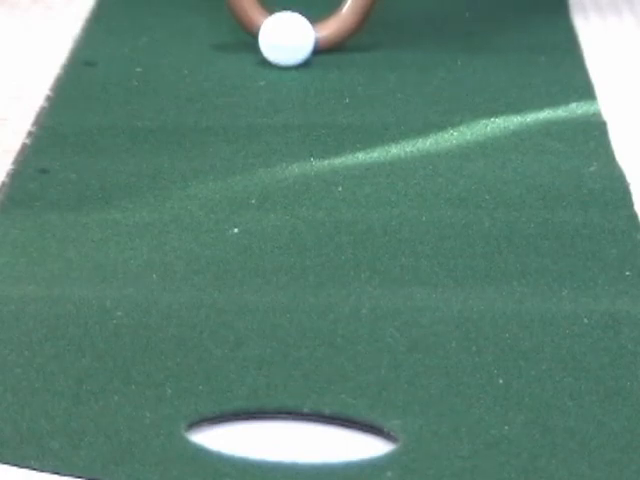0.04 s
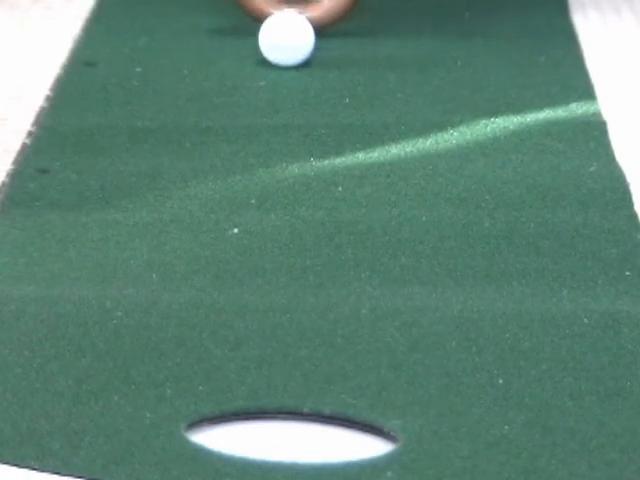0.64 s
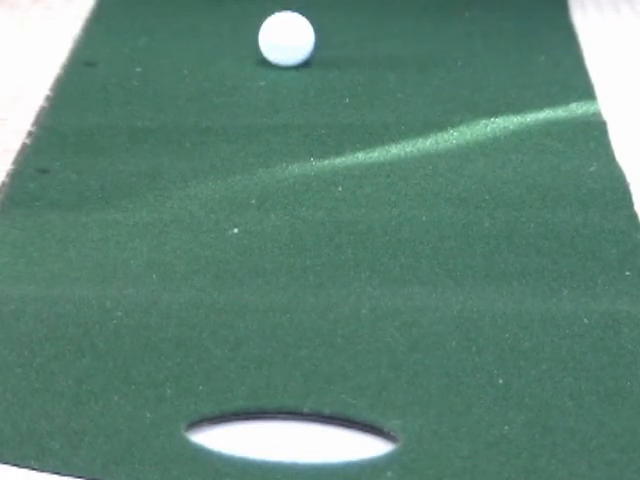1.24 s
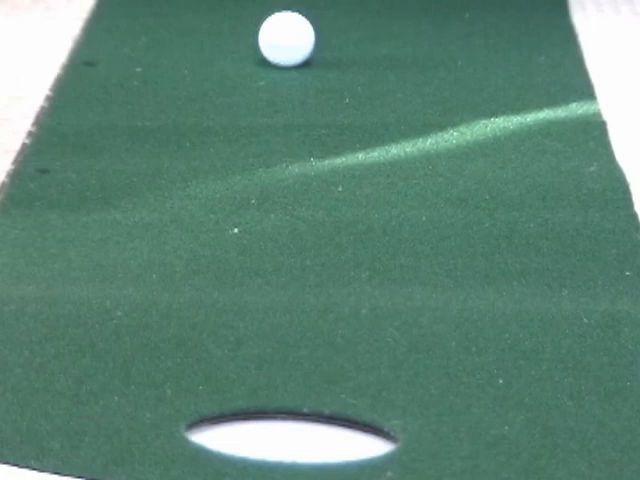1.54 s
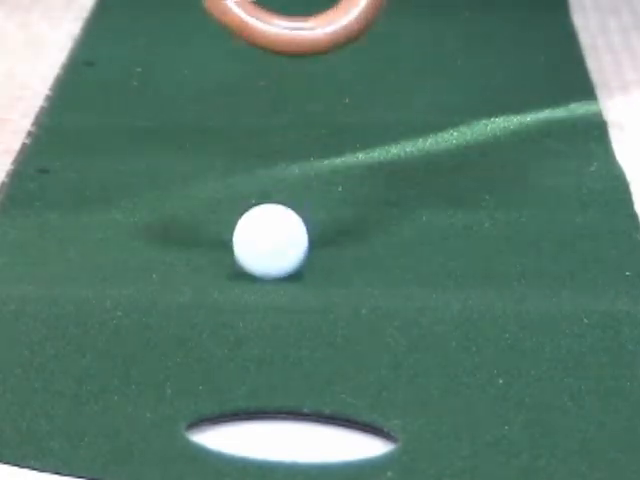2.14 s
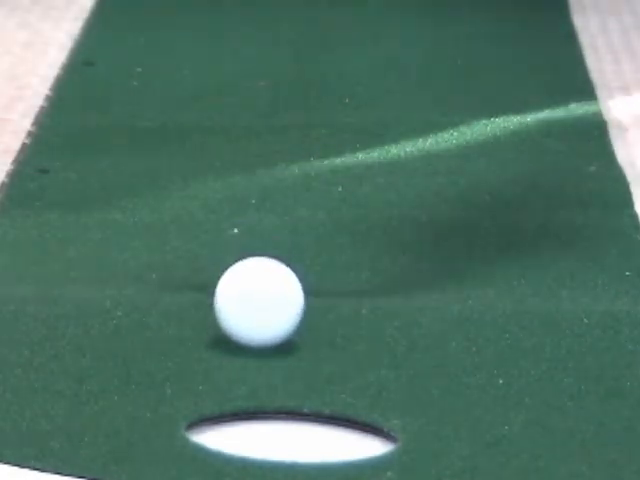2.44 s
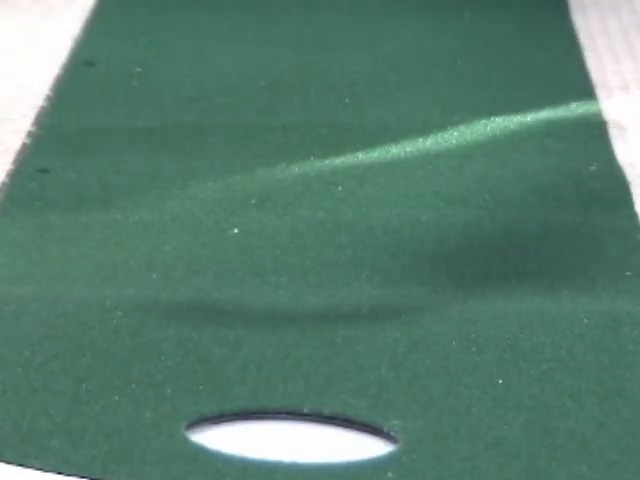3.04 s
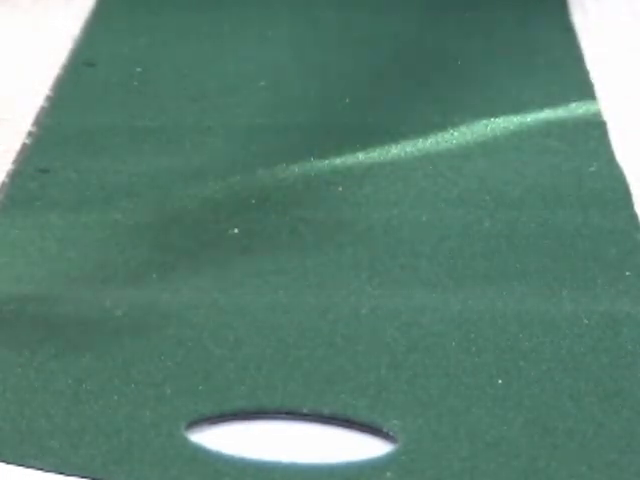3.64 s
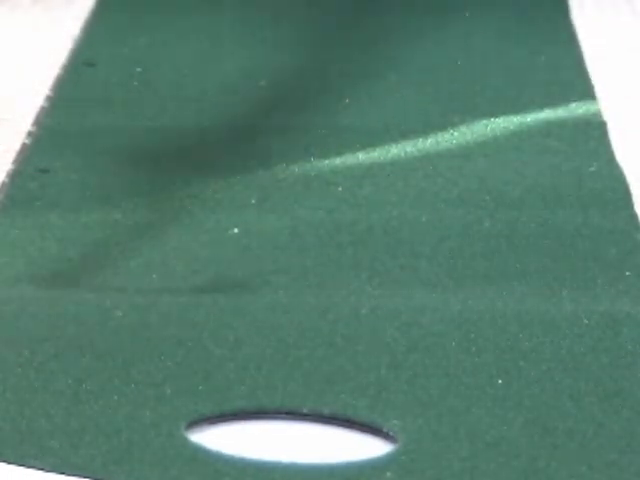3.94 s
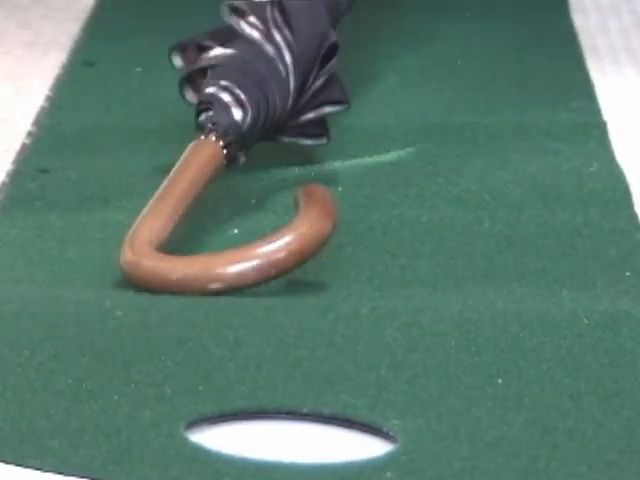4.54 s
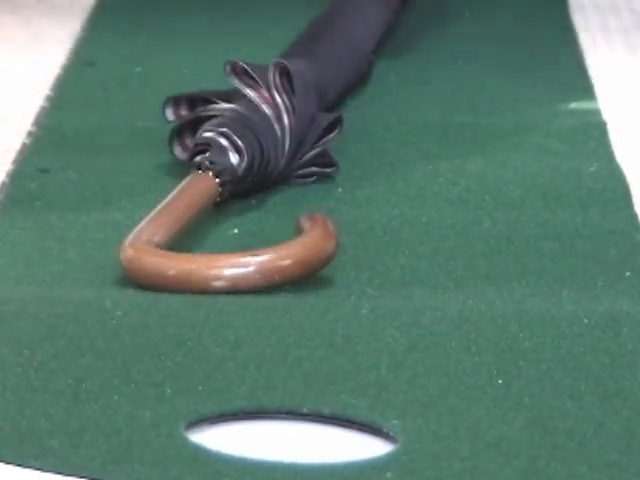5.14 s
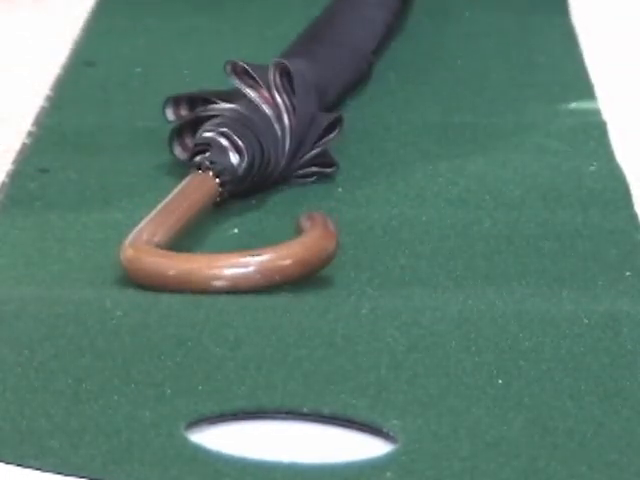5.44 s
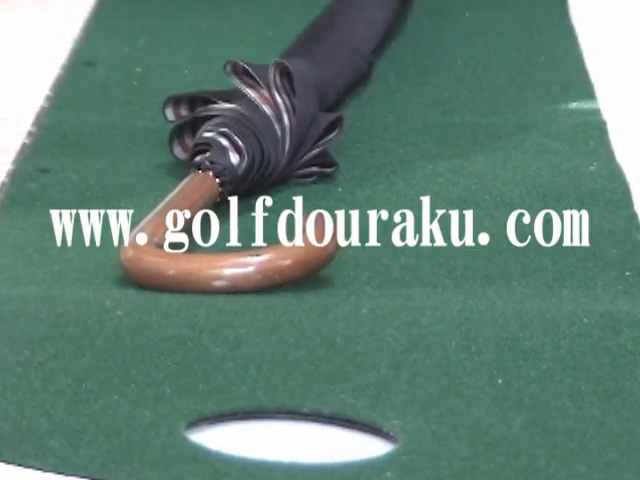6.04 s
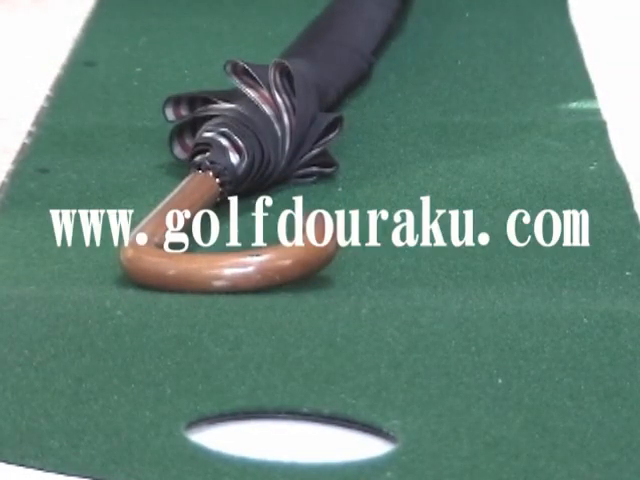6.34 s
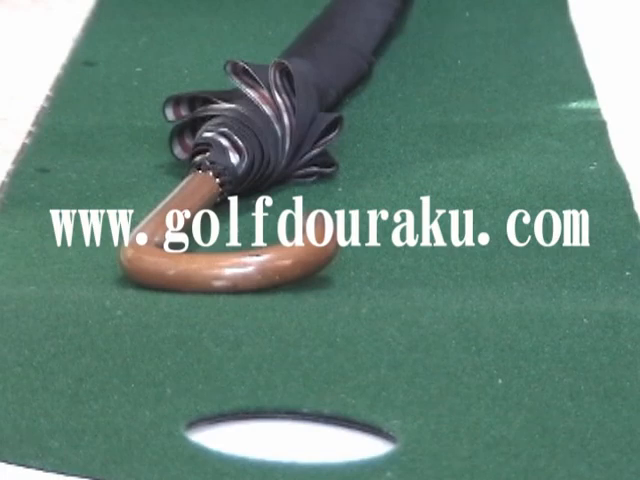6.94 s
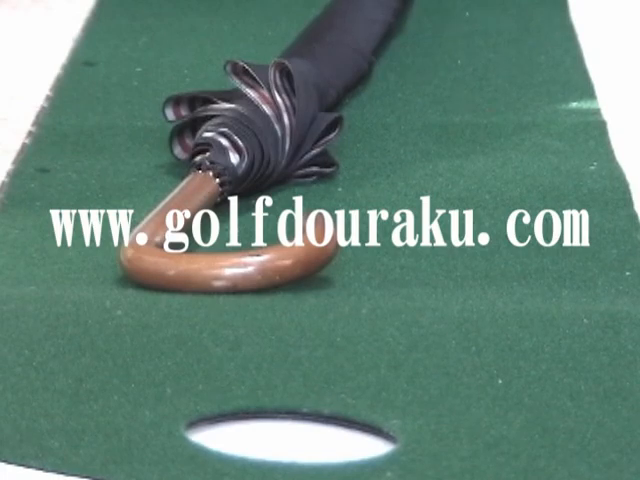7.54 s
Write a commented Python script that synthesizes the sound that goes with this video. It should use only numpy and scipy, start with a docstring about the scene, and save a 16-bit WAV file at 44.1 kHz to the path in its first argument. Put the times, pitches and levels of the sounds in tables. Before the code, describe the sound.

Indoors, a wooden click sends a golf ball into a cup with a loud hollow knock and rattle, followed by soft rustling and thumps.

```python
"""Indoor putt with an umbrella

In a small, hard room the wooden handle of an umbrella clicks against a golf ball. The ball hops and
rolls along a mat, drops into the cup with a hollow knock and clacks about below. Clothes rustle and the
umbrella is laid down. A tape camcorder stands by the cup: its motor whines, and its comb filter (a row
of evenly spaced notches) cuts the hum of its spinning head drum."""
import sys
import numpy as np
from scipy import signal
from scipy.fft import rfft, irfft, next_fast_len
from scipy.io import wavfile

SR = 44100
rng = np.random.default_rng(int(sys.argv[2]) if len(sys.argv) > 2 else 0)


def transcribe(u):
    """Save the signal u as a 16-bit wav file named by the first command-line argument.

    u: samples, shape (n,) or (channels, n), limited to [-1, 1]; the rate is SR.
    q: integer samples, one column per channel.
    """
    v = np.clip(np.atleast_2d(u).T, -1, 1)
    q = np.round(v * 32767).astype(np.int16)
    wavfile.write(sys.argv[1], SR, q)


N = 343098
TIME = np.arange(N) / SR
HIT_SIZE = 32768   # samples for one hit and its echo
PUTT_S, PUTT_DB = 1.776, 21.5   # the handle meets the ball
DROP_S, DROP_DB = 2.7303, 33.1   # the ball meets the bottom of the cup


def from_db(db):
    """Turn decibels into a gain to multiply by."""
    return 10 ** (np.asarray(db) / 20)


def rms_one(x):
    """Scale a sound to an average (rms) level of 1."""
    return x / np.sqrt(np.mean(x ** 2) + 1e-20)


def at_hz(points, hz):
    """Read between the (frequency, value) rows of a table, on an axis of octaves."""
    frequencies, values = np.transpose(points)
    return np.interp(np.log(np.maximum(hz, 1)), np.log(frequencies), values)


def bins(size):
    """The frequencies in the spectrum of a sound this many samples long."""
    return np.arange(size // 2 + 1) * SR / size


def peaks(table, hz):
    """The boost in dB from resonances, the pitches at which a thing likes to ring."""
    return sum(db * np.exp(-2 * ((hz - centre) / width) ** 2) for centre, width, db in table)


def add(out, s, sound):
    """Mix a sound in at time s."""
    start = int(round(s * SR))
    out[:, start:start + sound.shape[-1]] += sound[..., :N - start]


def drift(rate):
    """A random wander of about 1 either way, turning `rate` times a second."""
    knots = rng.standard_normal(4096)
    return np.interp(TIME * rate, np.arange(len(knots)), knots)


def swell(s, rise, t60):
    """A soft rise up to time s, then a fade; t60 is the time it takes to fade by 60 dB."""
    db = np.where(TIME < s, -20 * ((s - TIME) / rise) ** 2, -60 * (TIME - s) / t60)
    return from_db(np.maximum(db, -200))


def bell_curve(s, half_length):
    """A movement that grows and ebbs evenly around time s."""
    return np.exp(-np.minimum(((TIME - s) / half_length) ** 2, 40))


def stereo_spectrum(size, side_db=0.0):
    """The spectrum of white noise as two close microphones hear it: nearly alike."""
    # how much left and right differ: (frequency [Hz], level of the difference [dB])
    width = [(100, -21), (400, -20), (1200, -13.5), (2500, -16), (7000, -15.5), (13000, -17)]
    mid, side = rfft(rng.standard_normal((2, size)))
    return mid + from_db(side_db + at_hz(width, bins(size))) * side * [[1], [-1]]


def noise(colour, side_db=0.0):
    """Stereo noise at level 1 with a given colour, its balance of low and high pitches."""
    size = next_fast_len(N)
    spectrum = stereo_spectrum(size, side_db) * from_db(at_hz(colour, bins(size)))
    return rms_one(irfft(spectrum, size)[:, :N])


def room(direct_db, bright_hz, build_s=0.00097):
    """The room answers a click: direct sound, early echoes and a tail that dies band by band."""
    # echoes off near surfaces: (delay [s], level against the direct sound [dB])
    echoes = [(.0031, -7), (.0069, -13.5), (0.0101, -8), (0.0165, -19), (.0315, -12.5)]
    # how long the room rings: (frequency [Hz], t60 [s])
    fade_times = [(100, 0.35), (300, 0.22), (600, 0.21), (1500, .23), (4000, 0.23), (10000, 0.18)]
    t, hz = TIME[:HIT_SIZE], bins(HIT_SIZE)
    early = np.zeros(HIT_SIZE)
    for delay, db in [(0.00026, 0.0047)] + echoes:   # the direct sound comes first
        early[int(delay * SR)] += from_db(db + direct_db)
    # felt and cup wall shade the near paths, so most of the treble arrives through the room
    early = signal.sosfilt(signal.butter(1, bright_hz, fs=SR, output="sos"), early)
    white, tail = stereo_spectrum(HIT_SIZE), 0
    edges = np.r_[0, np.geomspace(140, 14000, 19), SR / 2]
    for low, high in zip(edges, edges[1:]):
        decay = from_db(-60 * t / at_hz(fade_times, (low + high) / 2)) * (1 - np.exp(-t / build_s))
        band = irfft(white * ((hz >= low) & (hz < high))) * decay
        tail = tail + rms_one(band) * np.sqrt(2 * (high - low) / SR / HIT_SIZE)
    return rms_one(early + tail) / np.sqrt(HIT_SIZE)


def contact(colour_db, response):
    """One sharp click of a given colour, sent through the room's response."""
    cepstrum = irfft(np.log(from_db(colour_db)))
    # folding this onto its first half keeps the colour and packs the energy at the click's start
    cepstrum[1:HIT_SIZE // 2] *= 2
    cepstrum[HIT_SIZE // 2 + 1:] = 0
    return -irfft(np.exp(rfft(cepstrum)) * rfft(response))


def ringing(tones):
    """The fading tones of a struck thing; every second one is flipped, so they swell and beat."""
    t = TIME[:HIT_SIZE]
    return sum((-1) ** k * from_db(db - 60 * t / t60) * np.sin(2 * np.pi * hz * t)
               for k, (hz, db, t60) in enumerate(tones))


def camcorder(hiss_db=-56.5, bearing_db=-75.5, throb_hz=39.7, throb_db=4.0):
    """The tape motor hums in narrow bands and a bearing sings in throbs, over a steady hiss."""
    # motor resonances: (frequency [Hz], width [Hz], level [dB])
    resonances = [(123, 14.6, -70), (283.1, 7.6, -68), (329.6, 8, -69), (478.7, 13, -70.5),
                  (658, 26, -73.5), (800, 8.7, -75.5), (867, 8.2, -73), (988, 20, -77), (1334, 22, -75.5),
                  (2090, 580, -70), (8020, 200, -86.5), (8550, 210, -86)]
    # colour of the bearing's song: (frequency [Hz], level [dB])
    bearing_colour = [(4300, -40), (5050, 4.5), (5350, 9), (5480, 2.5), (5750, -25), (6500, -41)]
    # steady noise of room and camcorder: (frequency [Hz], level [dB])
    hiss_colour = [(15, -32), (25, -12.5), (108, -6), (250, -10), (325, -4), (361, -8.5), (494, -8.5),
                   (609, -10.5), (833, -9), (1230, -13.5), (3080, -21), (5340, -25), (6250, -29.5),
                   (10500, -35.5), (13000, -44)]
    size = next_fast_len(N)
    power = sum(from_db(db) ** 2 / width / (1 + (2 * (bins(size) - hz) / width) ** 4)
                for hz, width, db in resonances)
    motor = irfft(stereo_spectrum(size, side_db=8.0) * np.sqrt(power * SR / 2), size)[:, :N]
    throb = throb_db * np.sin(2 * np.pi * throb_hz * TIME)
    bearing = from_db(bearing_db + throb) * noise(bearing_colour)
    return motor + bearing + from_db(hiss_db) * noise(hiss_colour, side_db=9.5)


def head_drum(spin_hz=149.85, wobble_turns=.0015, size=4096):
    """The same buzz repeats on every turn of the camcorder's head drum, whose speed wavers slightly."""
    # buzz on high multiples of the spin rate: (frequency [Hz], level of each tone [dB])
    buzz = [(3000, -102), (4500, -101.5), (5600, -93.5), (6500, -95), (8300, -96), (9200, -96.5),
            (10200, -96), (12400, -104)]
    # the strongest tones: (multiple of the spin rate, level [dB])
    whine = [(36, -76.5), (38, -82.5), (40, -86.5), (54, -86.5), (56, -88), (66, -89.5), (68, -91.5),
             (70, -92.5), (72, -93.5)]
    multiples = np.arange(20, 84)
    tones = np.zeros(size // 2 + 1, complex)
    tones[multiples] = from_db(at_hz(buzz, multiples * spin_hz))
    for multiple, db in whine:
        tones[multiple] = from_db(db)
    phases = np.exp(2j * np.pi * rng.random(len(tones)))
    one_turn = irfft(tones * phases) * size / np.sqrt(2)
    turns = spin_hz * TIME + wobble_turns * drift(11)
    return np.interp(turns, np.arange(size) / size, one_turn, period=1)


def ticks(ring_height_db=22.0):
    """Small things tick somewhere, light and bright, heard mostly through the room."""
    # each tick: (time [s], level [dB], ring pitch [Hz], ring width [octaves])
    clicks = [(2.157, -18, 3380, .1), (4.54, -12.5, 4930, .3), (6.889, -17.5, 4670, 0.96),
              (7.669, -21, 5750, 1.15)]
    out, hz = np.zeros((2, N)), bins(HIT_SIZE) + 1
    response = room(direct_db=-5.0, bright_hz=9000, build_s=0.00041)
    for s, db, ring_hz, octaves in clicks:
        ring = np.exp(-(np.log2(hz / ring_hz) / octaves) ** 2)
        add(out, s, contact(db + ring_height_db * (ring - 1), response))
    return out


def cloth(grain_db=2.5, split_hz=3000):
    """Fabric slides in strokes made of tiny uneven slips; a bright stroke trades body for treble."""
    # colour of sliding fabric: (frequency [Hz], level [dB])
    colour = [(200, -2), (600, -2), (1200, 0), (2500, -3.5), (4500, -6.5), (7000, -9), (10000, -14),
              (13000, -21.5)]
    # sleeves and umbrella fabric move: (time [s], level [dB], half length [s], brightness [dB])
    strokes = [(1.686, -67, 0.092, -9.5), (3.451, -53.5, 0.065, 2), (3.54, -55, 0.25, -0.5),
               (3.855, -55.5, .075, -3), (4.362, -52.5, 0.043, -2), (4.528, -56.5, 0.12, 0.5),
               (4.673, -60.5, 0.056, 2.5), (4.967, -54, 0.062, 1), (6.897, -71, 0.26, 1.5),
               (7.76, -65.5, 0.25, 0.5)]
    slide = noise(colour)
    dull = signal.sosfilt(signal.butter(1, split_hz, fs=SR, output="sos"), slide)
    body = treble = 0
    for s, db, half, bright_db in strokes:
        stroke = from_db(db) * bell_curve(s, half)
        body = np.hypot(body, stroke * from_db(-bright_db))   # hypot adds noise levels by power
        treble = np.hypot(treble, stroke * from_db(2 * bright_db))
    return (body * dull + treble * (slide - dull)) * from_db(grain_db * drift(250))


def bumps():
    """Feet and umbrella land softly on the floor: a bass thump with a dull wooden knock."""
    # each blow: (time [s], bass [dB], knock [dB], rise [s], t60 [s])
    blows = [(3.657, -44.5, -39.5, 0.053, 0.39), (3.865, -46.5, -60.5, 0.042, 0.41),
             (3.905, -46.5, -69, 0.025, 0.4), (4.36, -48, -53.5, 0.026, 0.4), (4.63, -51, -64, 0.024, 0.19),
             (5.335, -75, -53.5, 0.026, 0.18)]
    # colour of the thump: (frequency [Hz], level [dB])
    bass_colour = [(25, -8), (50, -2.5), (85, 3), (130, -5.5), (200, -10.5), (500, -54)]
    # colour of the knock: (frequency [Hz], level [dB])
    knock_colour = [(120, -23), (250, -5), (400, -0.5), (550, -5), (850, -12.5), (1500, -23.5),
                    (4000, -35.5), (10000, -62)]
    bass = sum(from_db(db) * swell(s, rise, t60) for s, db, _, rise, t60 in blows)
    knock = sum(from_db(db) * swell(s, rise, t60) for s, _, db, rise, t60 in blows)
    return bass * noise(bass_colour) + knock * noise(knock_colour)


def mat(start_m=1.5, cup_m=0.22, arrival_db=-53, shudder_db=-43.5, rise_s=0.0054):
    """The ball hops and rumbles nearer over the mat; its drop shakes the mat's frame."""
    # feet and umbrella press on the mat and make it rumble: (time [s], level [dB], half length [s])
    presses = [(.2, -62, 0.19), (1.2, -68.5, 0.7), (1.797, -61.5, 0.16), (4.556, -62, .15),
               (4.997, -62, 0.31)]
    # colour of the rumble: (frequency [Hz], level [dB])
    colour = [(12, -30), (28, -18), (55, -1.5), (90, -5), (120, 5), (180, -24), (400, -53)]
    # soft thuds of the player's feet and the hopping ball: (time [s], level [dB], pitch [Hz])
    thuds = [(.715, -47.5, 75), (.79, -53, 62), (1.1, -51, 60), (1.941, -44, 89), (2.03, -42.5, 86),
             (2.096, -47, 80), (2.515, -51, 113), (2.56, -53, 110), (2.61, -49, 106), (2.659, -44, 111)]
    distance = np.interp(TIME, [PUTT_S, DROP_S], [start_m, cup_m])   # from the microphone
    approach = from_db(arrival_db) * cup_m / distance * (TIME > PUTT_S) * (TIME < DROP_S)
    shudder = from_db(shudder_db) * swell(DROP_S, rise_s, t60=4)
    press_power = sum((from_db(db) * bell_curve(s, half)) ** 2 for s, db, half in presses)
    out = np.sqrt(approach ** 2 + shudder ** 2 + press_power) * noise(colour)
    t = TIME[:HIT_SIZE]
    push = (t / rise_s) ** 2 * np.exp(-t / rise_s)   # felt softens the start of each thud
    for s, db, hz in thuds:
        add(out, s, from_db(db) * push / push.max() * np.sin(2 * np.pi * hz * t))
    return out


def rolling(rest_s=4.43, full_hum_db=-58.5, full_rattle_db=-53, lumpy_db=3.0):
    """The ball circles the hard cup, which hums and rattles less as the ball slows evenly to rest."""
    # surges as it swerves against the wall: (time [s], hum [dB], rattle [dB])
    swerves = [(2.855, -38, -53), (2.965, -38, -48), (3.015, -42.5, -47), (3.127, -41, -38),
               (3.35, -52.5, -55)]
    # colour of the hollow hum: (frequency [Hz], level [dB])
    hum_colour = [(150, -15.5), (270, -6), (410, -4.5), (500, -7.5), (700, -12.5), (1000, -15), (3000, -58)]
    # colour of the rattle: (frequency [Hz], level [dB])
    rattle_colour = [(300, -21), (700, 0.5), (1100, -3), (1500, -4), (2000, -4.5), (8000, -32)]
    speed = np.interp(TIME, [DROP_S, rest_s], [1, 0], left=0)
    hum, rattle = from_db(full_hum_db) * speed, from_db(full_rattle_db) * speed
    for s, hum_db, rattle_db in swerves:
        surge = swell(s, rise=0.045, t60=0.2)
        hum = np.hypot(hum, from_db(hum_db) * surge)
        rattle = np.hypot(rattle, from_db(rattle_db) * surge)
    return (hum * noise(hum_colour) + rattle * noise(rattle_colour)) * from_db(lumpy_db * drift(70))


def clacks(ring_octaves=0.34, treble_hz=2600):
    """The ball clacks about; each clack has its own ring and brightness, from thin tick to dull knock."""
    # each hit: (time [s], level [dB], ring pitch [Hz], ring boost [dB], treble [dB], cut-off [Hz])
    hits = [(2.895, -13, 5650, 9, 4, 12000), (2.9827, 11, 1310, 7, -11, 7000),
            (3.0685, 16.5, 1030, 2.5, 0, 8300), (3.119, -4, 657, 19, -23, 2000),
            (3.188, 1.5, 800, 12.5, 5.5, 3700), (3.555, -7.5, 2620, 8.5, -2.5, 7000)]
    # colour of every clack: (frequency [Hz], level [dB])
    colour = [(60, -21), (120, -0.5), (230, -11), (420, -5), (950, -4.5), (1500, -5.5), (2300, -6),
              (3800, -5.5), (5700, -10), (8000, -16.5), (13000, -28)]
    # resonances of every clack: (frequency [Hz], width [Hz], boost [dB])
    resonances = [(674, 77, 3.6), (1040, 110, 4), (1770, 170, 3.8), (2750, 200, 4.5), (3630, 440, 3.4),
                  (4100, 180, 3.8), (5030, 260, 2.7), (5800, 250, 5.4)]
    out, hz = np.zeros((2, N)), bins(HIT_SIZE) + 1
    body = at_hz(colour, hz) + peaks(resonances, hz)
    for s, db, ring_hz, ring_db, treble_db, cut_hz in hits:
        ring = ring_db * np.exp(-(np.log2(hz / ring_hz) / ring_octaves) ** 2)
        treble = treble_db / (1 + (treble_hz / hz) ** 4)
        top_cut = 10 * np.log10(1 + (hz / cut_hz) ** 4)
        response = room(direct_db=-6.5, bright_hz=4020, build_s=0.00015)
        add(out, s, contact(db + body + ring + treble - top_cut, response))
    return out


def putt():
    """The wooden handle clicks against the ball and rings on."""
    # colour of the click: (frequency [Hz], level [dB])
    colour = [(100, -20), (220, -20), (360, -4.5), (520, -8.5), (900, -7.5), (1350, -4), (1900, -1.5),
              (2800, -13), (3600, -16), (4400, -17), (5600, -15.5), (6500, -21.5), (8500, -26),
              (13000, -35.5)]
    # resonances of the click: (frequency [Hz], width [Hz], boost [dB])
    resonances = [(373, 90, 1.5), (693, 55, 4), (1100, 97, 3.5), (1270, 90, 2.5), (1570, 150, 4),
                  (4150, 300, 8), (5330, 250, 4.5), (5930, 270, 7), (6750, 180, 12.5), (7240, 140, 12),
                  (7600, 160, 7), (9380, 300, 7)]
    # ringing of the handle: (pitch [Hz], level [dB], t60 [s])
    handle_tones = [(1107, -30, 0.15), (1303, -31, .15), (1553, -34, 0.28), (1595, -39, .28),
                    (1710, -34, .25), (1784, -32, 0.22), (1900, -27, 0.14), (2010, -28, 0.16)]
    out, hz = np.zeros((2, N)), bins(HIT_SIZE)
    click_db = PUTT_DB + at_hz(colour, hz) + peaks(resonances, hz)
    response = room(direct_db=-0.5, bright_hz=2500)
    add(out, PUTT_S, contact(click_db, response) + ringing(handle_tones))
    return out


def drop():
    """The ball lands in the cup and sets its hollow frame ringing."""
    # colour of the knock: (frequency [Hz], level [dB])
    colour = [(20, -44), (70, -18), (120, -9.5), (190, -23), (350, -2), (540, -6), (740, -3), (950, -8),
              (1400, -13), (1900, -17), (2900, -22), (4000, -19), (8000, -28), (13000, -39)]
    # resonances of the knock: (frequency [Hz], width [Hz], boost [dB])
    resonances = [(770, 38, 2), (776, 73, 5.5), (1090, 90, 2.5), (1320, 93, 3.6), (2205, 190, 6.4),
                  (3650, 310, 5.7), (4160, 200, 3), (4650, 286, 2.8), (7850, 254, 3.1)]
    # ringing of cup and frame: (pitch [Hz], level [dB], t60 [s])
    cup_tones = [(288, -33, 0.26), (325.2, -21, 0.33), (389.6, -19, 0.22), (421.4, -20, 0.37),
                 (483, -23, 0.37), (510, -21, 0.22), (555, -28, 0.28), (682, -12.5, 0.13),
                 (715, -13, 0.122), (809, -15, 0.12), (1145, -31.5, 0.32), (1150, -34, 0.16),
                 (1303, -33, 0.26)]
    out, hz = np.zeros((2, N)), bins(HIT_SIZE)
    knock_db = DROP_DB + at_hz(colour, hz) + peaks(resonances, hz)
    response = room(direct_db=-4.5, bright_hz=3800, build_s=0.00044)
    add(out, DROP_S, contact(knock_db, response) + ringing(cup_tones))
    return out


def scene():
    """Ball, umbrella and clothes in front of the murmuring camcorder."""
    # the action lies a little to the right: (frequency [Hz], left minus right [dB])
    balance = [(50, -3), (200, -1), (4000, -2), (9000, -1), (13000, 0)]
    action = putt() + drop() + clacks() + mat() + rolling() + bumps() + cloth() + ticks()
    size = next_fast_len(N)
    pan = from_db(at_hz(balance, bins(size)) / 2 * [[1], [-1]])
    panned = irfft(rfft(action, size) * pan, size)[:, :N]
    return panned + camcorder() * from_db([[-.5], [.5]])


def record(dry, comb_hz=150.0, feedback=0.49, ceiling=.76, cutoff_hz=12600):
    """A comb filter notches multiples of the drum's rate, its buzz leaks in and the top treble is cut."""
    size = next_fast_len(N + HIT_SIZE)
    hz = bins(size)
    turn_delay = np.exp(-2j * np.pi * hz / comb_hz)
    # the part of the sound that stays alike from one turn of the drum to the next
    repeating = (1 - feedback) / 2 * (1 + turn_delay) / (1 - feedback * turn_delay)
    depth = np.interp(hz, [1000, 5000], [0.87, 1.0])   # the notches are deepest in the treble
    out = irfft(rfft(dry, size) * (1 - depth * repeating), size)[:, :N] + head_drum()
    out = out / (1 + (out / ceiling) ** 6) ** (1 / 6)   # round off the loudest peaks
    return signal.sosfilt(signal.ellip(8, .2, 80, cutoff_hz, fs=SR, output="sos"), out)


dry = scene()
out = record(dry)
transcribe(out)
```